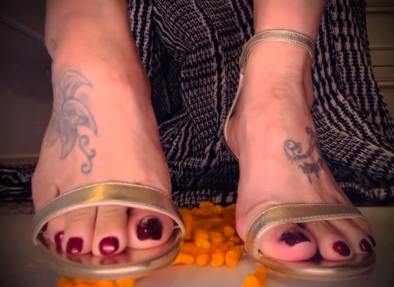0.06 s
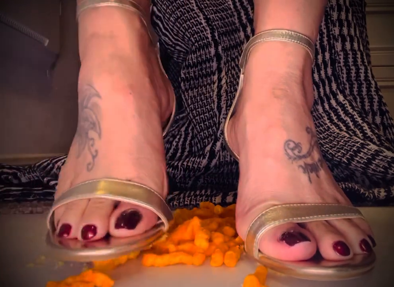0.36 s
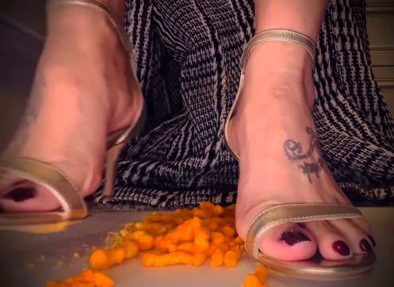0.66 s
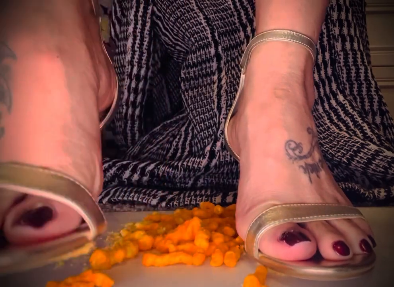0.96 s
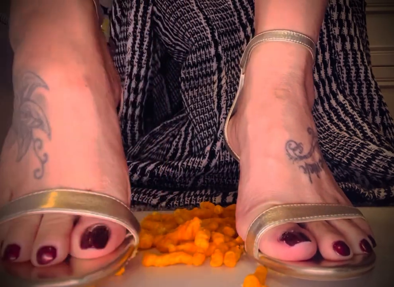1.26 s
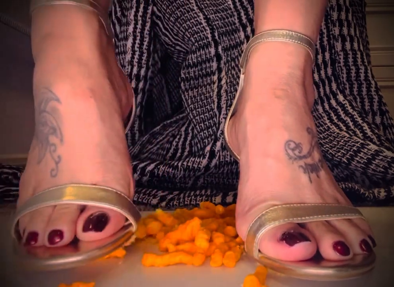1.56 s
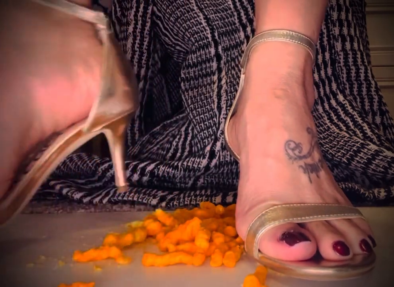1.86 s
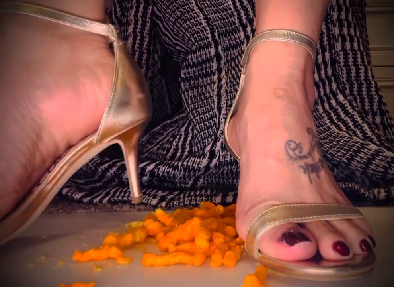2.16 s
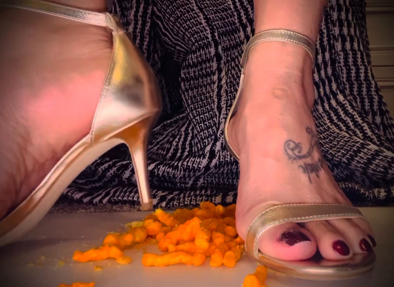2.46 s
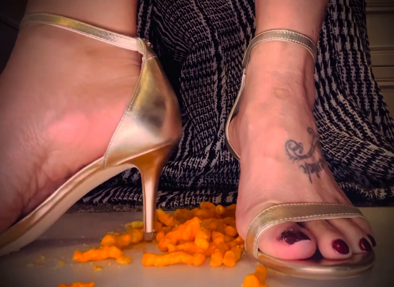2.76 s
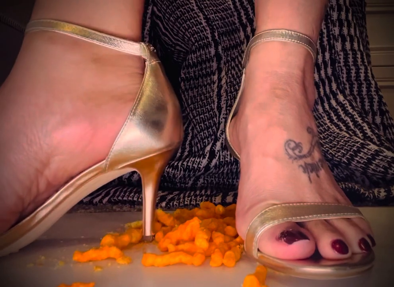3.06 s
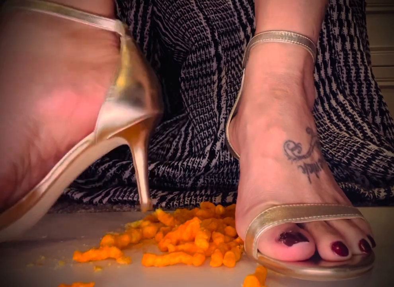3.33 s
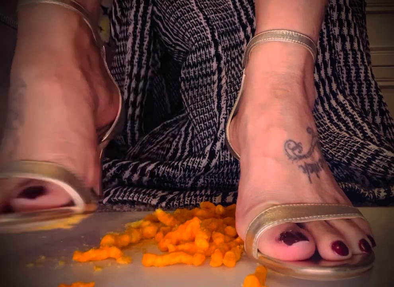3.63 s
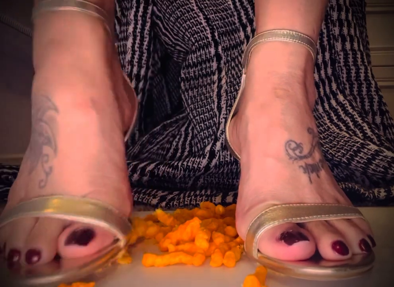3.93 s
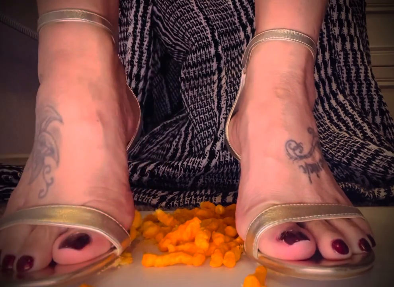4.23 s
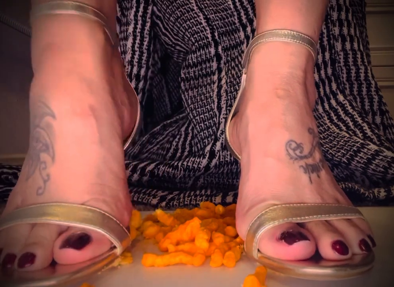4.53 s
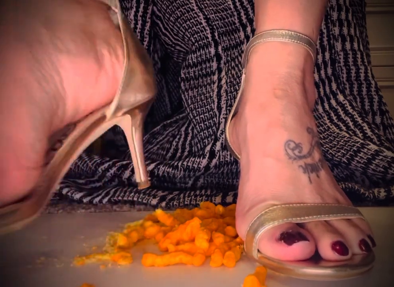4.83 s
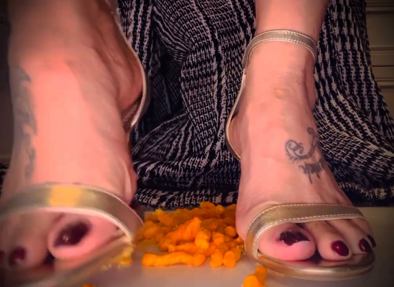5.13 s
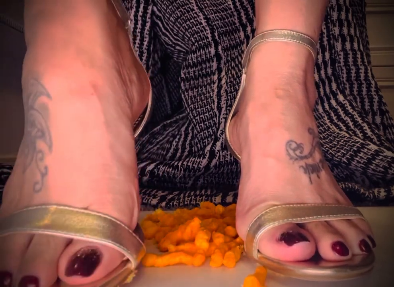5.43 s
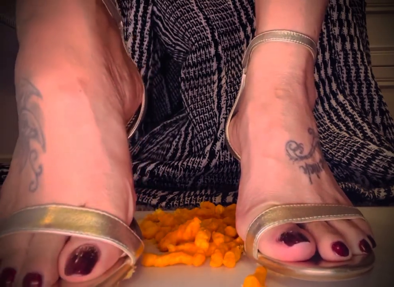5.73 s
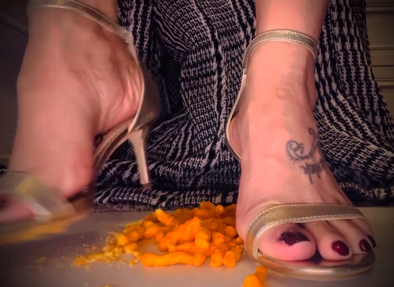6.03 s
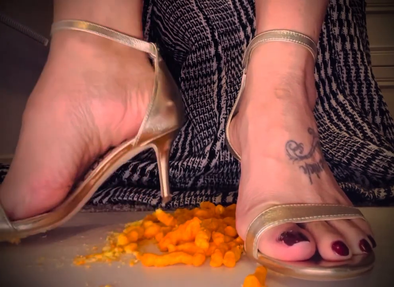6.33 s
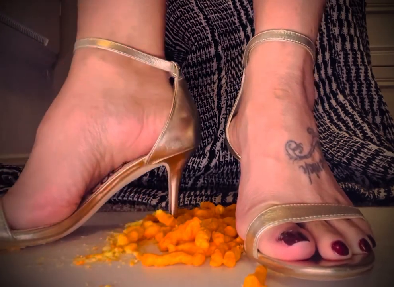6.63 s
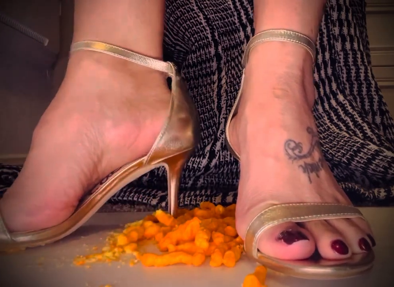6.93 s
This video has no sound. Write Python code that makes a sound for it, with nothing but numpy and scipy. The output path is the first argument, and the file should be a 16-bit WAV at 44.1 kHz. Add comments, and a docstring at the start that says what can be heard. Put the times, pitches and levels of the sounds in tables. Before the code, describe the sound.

Puffed corn snacks are crushed under a high-heeled sandal, heard up close in a small room with a faint low hum. Two gritty drags across the hard floor come first, followed by small snaps as the heel presses into the pile. Two louder, brittle crunches follow as the sole lands and the floor thuds. Brief scuffs and twists fall in between, and light knocks and crackling from the heel end it.

```python
"""A sole rasps back and forth over crumbs, then a high-heeled sandal crushes puffed corn snacks.
Hard floor in a small quiet room, one microphone close to the shoe. The thin heel pokes into the pile,
the sole comes down on it twice, and the heel pokes again: pieces snap, their cell walls crumble,
the shoe rings and the floor thuds under the weight. In between, the shoe scuffs and twists on crumb
dust. Behind it lie faint hiss, rumble and a low drone."""
import sys
import numpy as np
from scipy import signal
from scipy.fft import rfft, irfft
from scipy.io import wavfile

SR = 44100
rng = np.random.default_rng(int(sys.argv[2]) if len(sys.argv) > 2 else 0)


def generate_wav(sig):
    """Save sig (samples, or channels by samples) to the path in sys.argv[1] as 16-bit PCM at SR."""
    pcm = np.round(np.clip(np.atleast_2d(sig).T, -1, 1) * 32767).astype(np.int16)
    wavfile.write(sys.argv[1], SR, pcm)


N = 312669
TIME = np.arange(N) / SR

# whole pieces breaking: t/s, attack level/dB, decay of the splinters/s, pitch of the piece f/Hz
SNAPS = [(2.2974, -49, 0.0011, 4400), (2.336, -47, 0.0016, 4500), (2.5321, -38.5, 0.0012, 3500),
         (2.5677, -40, .002, 2120), (2.5886, -39.5, 0.00048, 3200), (2.5955, -44, .001, 3000),
         (2.6088, -44, .003, 3100), (2.6184, -40.5, .00043, 2600), (2.7385, -43, .0008, 3180),
         (2.7662, -48, .0006, 2300), (2.7818, -43, 0.00079, 5830), (2.8166, -48, 0.0005, 6600),
         (3.912, -45, .011, 6800), (3.9408, -23, .0017, 2400), (3.954, -33, .0008, 6500),
         (3.9602, -22.5, .0017, 2450), (3.975, -20, 0.006, 6300), (3.9935, -23, .0045, 2400),
         (4.026, -31, 0.007, 6500), (4.0583, -34.5, .0059, 3500), (4.091, -32, 0.0033, 3700),
         (4.177, -43.5, .004, 2970), (4.2475, -53, .0008, 7200), (4.333, -57, .003, 6000),
         (4.6463, -44, 0.0028, 2890), (5.229, -41, .0045, 1600), (5.258, -42, 0.0022, 2300),
         (5.3205, -23.5, 0.005, 7230), (5.3284, -23.5, 0.0036, 1490), (5.3764, -36, 0.0039, 7800),
         (5.4302, -34.5, 0.0035, 3100), (6.4859, -47, 0.0011, 3430), (6.7039, -33, 0.0036, 3300),
         (6.72, -38, 0.004, 2300), (6.7304, -36, 0.003, 2700), (6.786, -32, .002, 3550),
         (6.7966, -36.5, 0.0008, 2950), (6.8143, -41, .0006, 2700), (6.835, -49, .001, 3300),
         (6.8597, -51, 0.00041, 3100)]
# spectrum of the breaking snack: f/Hz, level/dB
CRUNCH_SPECTRUM = [(100, -22), (400, -14.5), (750, -17.5), (1550, -7.5), (2300, -4), (3400, -3.5),
                   (4300, -7.5), (5400, -6), (7100, -2.5), (8500, -5), (9300, -10), (14000, -13),
                   (16000, -23)]
# resonances of the sole: f/Hz, width/Hz, relative level/dB
SOLE_MODES = [(1090, 110, 0), (1413, 34, -2), (2120, 60, -4), (2505, 90, -1.5), (3496, 75, 6),
              (3740, 45, 0), (4735, 40, 1), (7050, 180, -7)]
# spectrum of the shaken floor: f/Hz, level/dB
FLOOR_SPECTRUM = [(40, -24), (85, -17), (120, -4.5), (148, 5), (200, 1), (230, -4), (268, -2.5), (310, -13),
                  (600, -20), (2000, -70)]


def snaps(treble_db, splinter_db=5.0, piece_db=-6.5, piece_t60=0.0045, size=4096):
    """A first crack sets off a dying run of splinters; all of them ring the piece at its own pitch."""
    out, t = np.zeros(N), np.arange(size) / SR
    body = response_of(CRUNCH_SPECTRUM)
    for s, snap_db, run_s, piece_hz in SNAPS:
        run = energy_one(grains(per_s=13000, spread_db=1.5, size=size) * np.exp(-t / run_s))
        # the longer the run, the more of the energy lies in it
        force = signal.unit_impulse(size) + from_db(splinter_db) * run_s / .002 * run
        piece = energy_one(through(force, np.gradient(ring(t, piece_hz, piece_t60))))
        share_db = np.interp(s, TIME, treble_db)   # as bright as the push it belongs to
        crack = energy_one(with_treble(through(force, body), share_db)) + from_db(piece_db) * piece
        attack_rms = np.sqrt(np.mean(crack[t < .004] ** 2))
        add(out, s, from_db(snap_db) * crack / attack_rms)
    return out


def crumbling(push, treble_db, level_db=-2.5, clump_db=2.3, dense_above_db=-37, dense_range_db=5):
    """Thin cell walls collapse in clumps: sparser under a light push, a dense crush under full weight."""
    body = response_of(CRUNCH_SPECTRUM)
    clumps = from_db(clump_db * drift(200))
    light = through(fragments(grains(per_s=4200, spread_db=2.7) * clumps), body)
    heavy = through(fragments(grains(per_s=9000, spread_db=2.5) * clumps), body)
    heavy_share = 1 / (1 + np.exp((dense_above_db - 20 * np.log10(push)) / dense_range_db))
    crackle = np.sqrt(1 - heavy_share) * light + np.sqrt(heavy_share) * heavy
    return from_db(level_db) * push * with_treble(crackle, treble_db)


def fragments(clicks, lowest_hz=1100, highest_hz=8500, q=9.0, ring_db=6, count=14):
    """Each click also rings one of many fragments, each with a pitch of its own."""
    struck, out = rng.integers(0, count, N), clicks
    for k, hz in enumerate(np.geomspace(lowest_hz, highest_hz, count)):
        own_clicks = clicks * (struck == k) + 1e-18
        out = out + from_db(ring_db) * signal.lfilter(*signal.iirpeak(hz, q, fs=SR), own_clicks)
    return rms_one(out)


def foot_load():
    """The foot bears down on the pile: gain and treble share/dB of all its pushes together."""
    # pushes: full load t/s, hold/s, level/dB, rise/s, release/s, treble share/dB
    pushes = [(2.169, 0.12, -56, .04, .3, -6.5), (2.603, 0.091, -48, 0.22, 0.2, -5.5),
              (3.942, 0.15, -41, 0.037, .11, -5), (3.976, 0.029, -27, .009, 0.054, -4),
              (5.332, 0.089, -46.5, 0.097, .1, -1.5), (6.488, 0.025, -55.5, 0.0456, .025, -7.5),
              (6.561, .004, -49, .014, .012, -7), (6.715, 0.035, -45, 0.04, 0.056, -9),
              (6.786, 0.01, -45, .014, 0.024, -6.5), (7.003, 0.037, -49, 0.054, 0.22, -6.5)]
    gains = np.array([swell(*push[:-1]) for push in pushes])
    power = np.sum(gains ** 2, axis=0)
    treble_db = np.array(pushes)[:, -1] @ gains ** 2 / power
    return np.sqrt(power), treble_db


def under_sole(s, down_s=3.8, lifted_s=5.6):
    """Whether the sole, rather than the heel, is on the pile at time s."""
    return (s > down_s) & (s < lifted_s)


def shoe_ring(cracks, crumbs, fine_above_hz=2000, heel_ring_db=-12.5):
    """The sole grinds the crumbs finer and rings with every break; the thin heel passes little on."""
    fine_crumbs = signal.sosfilt(signal.butter(1, fine_above_hz, "high", fs=SR, output="sos"), crumbs)
    covered = under_sole(TIME)
    sole = through((cracks + fine_crumbs) * covered, resonances(SOLE_MODES))
    heel = through((cracks + crumbs) * ~covered, resonances(SOLE_MODES, heel_ring_db))
    return sole + heel


def thuds(boom_t60=0.048, board_hz=116, board_t60=0.22, board_rise_s=.024,
          big_break_db=-22.5, drop_knock_db=-27, drop_boom_db=-37, size=22050):
    """Weight lands with a woody knock and a short boom; after a footfall the floorboard rings on."""
    # the shoe is set down or the weight shifts: t/s, knock level/dB, board level/dB, boom level/dB
    footfalls = [(1.183, -51, -52.5, -51.5), (1.984, -34, -48.5, -66), (3.912, -42, -54, -44),
                 (5.228, -36, -56, -47.5), (5.329, -20, -36.5, -38), (6.704, -34.5, -56, -52),
                 (6.73, -36, -50, -50)]
    # spectrum of the knock: f/Hz, level/dB
    knock_spectrum = [(30, -25), (70, -1.5), (150, 3), (330, -4.5), (540, 0), (1000, -8), (1600, -22),
                      (3800, -30), (7000, -55)]
    # its woody ring: f/Hz, level/dB against the impact's peak, t60/s
    knock_modes = [(558, -17, .04), (920, -13, .03)]
    out, t = np.zeros(N), np.arange(size) / SR
    impact, floor = response_of(knock_spectrum), response_of(FLOOR_SPECTRUM)
    impact = np.pad(impact, (0, size - len(impact))) / np.abs(impact).max()
    knock = impact + sum(from_db(db) * ring(t, hz, t60) for hz, db, t60 in knock_modes)
    board_rise = 1 - np.exp(-(t / board_rise_s) ** 2)
    board = early_rms_one(ring(t, board_hz, board_t60) * board_rise)
    dying = from_db(-60 * t / boom_t60)

    def boom():
        """A dying burst of noise shakes the floor."""
        return early_rms_one(through(rng.standard_normal(size) * dying, floor))

    for s, knock_db, board_db, boom_db in footfalls:
        add(out, s, from_db(knock_db) * knock + from_db(board_db) * board + from_db(boom_db) * boom())
    # a break under the sole lets it drop on the floor; small breaks hardly do
    for s, snap_db, *_ in SNAPS:
        drop = under_sole(s) * from_db(1.5 * (snap_db - big_break_db))
        add(out, s, drop * (from_db(drop_knock_db) * knock + from_db(drop_boom_db) * boom()))
    return out


def rumble(push, level_db=-10):
    """The sole sinks through the collapsing pile and shakes the floor, most of all under full weight."""
    shaking = rms_one(through(rng.standard_normal(N), response_of(FLOOR_SPECTRUM)))
    return from_db(level_db) * push * np.sqrt(push / push.max()) * shaking


def slides(judder_db=1.2, hollow_db=7.0, hollow_q=2.03):
    """Crumb dust catches and slips under the moving shoe thousands of times a second."""
    # hollow pitch of the gap between sole and floor: t/s, f/Hz
    gap_pitch = [(.25, 1380), (.43, 900), (1.3, 1300), (1.48, 1790), (1.56, 1180), (2.1, 1250),
                 (4.15, 3100), (5.76, 780), (5.86, 650), (5.9, 1600)]
    judder = from_db(judder_db * drift(220))
    friction, inner_friction = (grains(per_s=12000, spread_db=2.0) * judder for _ in range(2))
    gap_hz = np.interp(TIME, *np.transpose(gap_pitch))
    gap = from_db(hollow_db) * moving_resonance(inner_friction, gap_hz, hollow_q)
    return drags(friction, inner_friction, gap) + scuffs(friction, gap)


def drags(friction, inner_friction, gap, rasp_db=7.0, rasp_q=5.0, rasp_wander=.025):
    """Pressed flat, the sole rasps over the crumbs, back and then forward."""
    # spectrum of the flat sole rubbing: f/Hz, level/dB
    pressed_spectrum = [(100, -12), (300, -15), (820, -15.5), (1150, -7.5), (3200, -.5), (5100, -9),
                        (6200, -7), (8400, -10), (9700, -15.5), (16000, -28)]
    # pitch of the rasp, which also sounds an octave below: t/s, f/Hz
    rasp_pitch = [(.15, 8100), (.42, 7700), (1.18, 7100), (1.42, 6650)]
    # the two strokes: t/s, level/dB, treble share/dB
    back_drag = [(0.0, -53.5, -6), (0.058, -58.5, -6), (0.206, -44.5, -5.5), (0.348, -41.5, -5.5),
                 (0.42, -53, -8), (0.44, -73, 0)]
    forward_drag = [(1.173, -62, -5), (1.178, -43, -6), (1.341, -44, -13), (1.461, -34.5, -9),
                    (1.517, -45, -11.5), (1.569, -46.5, -11.5), (1.593, -56.5, -8.5), (1.605, -76, -7.5)]
    rasp_hz = np.interp(TIME, *np.transpose(rasp_pitch)) * (1 + rasp_wander * drift(20))
    rasp = sum(moving_resonance(inner_friction, hz, rasp_q) for hz in (rasp_hz, rasp_hz / 2))
    pressed = through(friction, response_of(pressed_spectrum)) + gap + from_db(rasp_db) * rasp
    out = np.zeros(N)
    for drag in (back_drag, forward_drag):
        s, level_db, treble_db = np.transpose(drag)
        out += stroke(s, level_db) * with_treble(pressed, np.interp(TIME, s, treble_db))
    return out


def scuffs(friction, gap, sole_ring_db=-3):
    """The edge of the shoe brushes the floor, or twists on its rim with a hollow scrape."""
    # spectrum of the edge brushing lightly: f/Hz, level/dB
    brushed_spectrum = [(100, -21.5), (560, -6.5), (1800, -6), (3400, -4), (4600, -6.5), (7700, -2.5),
                        (16000, -20)]
    # movements: full speed t/s, hold/s, level/dB, rise/s, release/s, treble share/dB
    brushes = [(3.202, .012, -55.5, 0.057, 0.057, -1), (3.335, 0.029, -61, 0.13, 0.029, -6),
               (5.754, 0.04, -58, 0.07, .05, -5), (5.833, 0.022, -40, 0.068, 0.048, -0.8)]
    twists = [(2.066, 0.04, -48.3, 0.034, 0.07, -10), (4.125, .1, -53, .05, .018, -8),
              (5.905, 0.011, -54, 0.049, 0.0084, -14), (6.665, .045, -51, .022, .04, -12)]
    # resonances of the rim: f/Hz, width/Hz, level/dB against the direct sound
    rim_modes = [(2000, 90, 2), (2450, 60, 0), (2860, 97, 8)]
    brushed = through(friction, response_of(brushed_spectrum)) + gap
    sole, rim = resonances(SOLE_MODES, sole_ring_db), resonances(rim_modes)
    out = np.zeros(N)
    for movements, shoe in ((brushes, sole), (twists, rim)):
        rubbed = through(brushed, shoe)
        for *movement, treble_db in movements:
            out += swell(*movement) * with_treble(rubbed, treble_db)
    return out


def room(x, near_db=-13, near_s=0.0089, tail_db=-19.5, tail_t60=0.24, dull_hz=9000, size=22050):
    """The microphone hears the direct sound, quick reflections off floor and shoes, then a soft tail."""
    t = np.arange(size) / SR
    near = rng.standard_normal(size) * np.exp(-t / near_s) * (t > .001)
    tail = rng.standard_normal(size) * from_db(-60 * t / tail_t60) * (t > .008)
    tail = signal.sosfilt(signal.butter(1, dull_hz, fs=SR, output="sos"), tail)
    return x + through(x, from_db(near_db) * energy_one(near) + from_db(tail_db) * energy_one(tail))


def room_tone(air_db=-62.5, drone_hz=111, overtone_hz=163, overtone_db=-6, drone_t60=0.34, rest_db=-72.5):
    """Steady hiss and rumble, with a wavering low drone that swells once and sinks back."""
    # spectrum of the room's noise: f/Hz, level/dB
    air_spectrum = [(22, -9), (40, -12), (120, -13.5), (250, -19.5), (1300, -31), (4000, -35.5),
                    (16000, -38.5)]
    # swell of the drone: peak t/s, hold/s, level/dB, rise/s, release/s
    drone_swell = (4.5, 1.05, -62, 0.04, 0.5)
    air = from_db(air_db) * rms_one(through(rng.standard_normal(N), response_of(air_spectrum)))
    t = TIME[:SR]
    modes = ring(t, drone_hz, drone_t60) + from_db(overtone_db) * ring(t, overtone_hz, drone_t60)
    drone = rms_one(through(rng.standard_normal(N), modes))
    return air + np.maximum(swell(*drone_swell), from_db(rest_db)) * drone


def swell(s, hold_s, level_db, rise_s, release_s, range_db=19.5, rise_bend=1.87, release_bend=1.2):
    """Gain that builds up, holds and dies away; rise and release each cover range_db."""
    early = np.maximum(s - TIME, 0) / rise_s
    late = np.maximum(TIME - s - hold_s, 0) / release_s
    below_db = range_db * (early ** rise_bend + late ** release_bend)   # bends above 1 round the top
    return from_db(np.maximum(level_db - below_db, -200))


def stroke(s, level_db, edge_s=0.0036):
    """Gain of one movement of the foot, silent outside it."""
    gate = np.clip(np.minimum(TIME - s[0], s[-1] - TIME) / edge_s + 1, 0, 1)
    return gate * from_db(np.interp(TIME, s, level_db))


def grains(per_s, spread_db, size=N):
    """Random clicks, mostly small with a few large ones; rms 1."""
    born = rng.random(size) < per_s / SR
    sizes = from_db(spread_db * np.minimum(rng.exponential(1, size), 4))
    return rms_one(born * sizes * rng.choice([-1, 1], size))


def drift(per_s):
    """Random wander; rms 1."""
    knots = rng.standard_normal(int(per_s * N / SR) + 2)
    return rms_one(np.interp(TIME * per_s, np.arange(len(knots)), knots))


def with_treble(x, share_db, split_hz=5600):
    """Give the treble a set share of the power: finer fragments sound brighter."""
    low = signal.sosfilt(signal.butter(2, split_hz, fs=SR, output="sos").repeat(2, axis=0), x)
    high = signal.sosfilt(signal.butter(2, split_hz, "high", fs=SR, output="sos").repeat(2, axis=0), x)
    share = np.clip(from_db(share_db) ** 2, .01, .9)
    return np.sqrt(1 - share) * rms_one(low) + np.sqrt(share) * rms_one(high)


def ring(t, hz, t60):
    """One dying mode."""
    return np.sin(2 * np.pi * hz * t) * from_db(-60 * t / t60)


def resonances(modes, ring_db=0, size=4096):
    """A click heard directly, followed by the ring of the shoe."""
    click = signal.unit_impulse(size)
    rings = sum(from_db(db + ring_db) * signal.lfilter(*signal.iirpeak(hz, hz / width, fs=SR), click)
                for hz, width, db in modes)
    return energy_one(click + rings)


def moving_resonance(x, hz, q, size=512):
    """A resonance whose pitch follows the curve hz."""
    out, state = np.zeros(N), np.zeros((2, 2))
    for i in range(0, N, size):
        peak = np.concatenate(signal.iirpeak(hz[i], q, fs=SR))
        out[i:i + size], state = signal.sosfilt([peak, peak], x[i:i + size], zi=state)
    return out


def response_of(spectrum, size=4096):
    """Causal (minimum-phase) impulse response with the given spectrum; energy 1."""
    hz, db = np.transpose(spectrum)
    grid = np.maximum(np.arange(size // 2 + 1) * SR / size, 1)
    gain = from_db(np.interp(np.log(grid), np.log(hz), db))
    cepstrum = irfft(np.log(gain))
    cepstrum[1:size // 2] *= 2
    cepstrum[size // 2 + 1:] = 0
    return energy_one(irfft(np.exp(rfft(cepstrum))))


def through(x, response):
    """Pass a sound through an impulse response."""
    return signal.fftconvolve(x, response)[:len(x)]


def add(out, s, sound):
    """Mix a sound in at time s."""
    start = max(round(s * SR), 0)
    part = out[start:start + len(sound)]
    part += sound[:len(part)]


def from_db(db):
    """Decibels to gain."""
    return 10 ** (np.asarray(db) / 20)


def rms_one(x):
    """Scale to rms 1."""
    return x / np.sqrt(np.mean(x ** 2) + 1e-20)


def energy_one(x):
    """Scale to energy 1."""
    return x / np.sqrt(np.sum(x ** 2) + 1e-20)


def early_rms_one(x):
    """Scale a thud to rms 1, taking it to last 30 ms."""
    return energy_one(x) * np.sqrt(.03 * SR)


def scene():
    """Everything the foot does, heard from close by over the room tone; mono."""
    push, treble_db = foot_load()
    background = room_tone()
    shoe_on_floor = slides() + thuds() + rumble(push)
    crumbs = crumbling(push, treble_db)
    crunch = shoe_ring(snaps(treble_db), crumbs)
    return (room(crunch + shoe_on_floor) + background)[None]


def record(dry, cutoff_hz=16200, dc_offset=.0078):
    """The recorder cuts the top and adds a small constant offset."""
    return signal.sosfilt(signal.ellip(10, .1, 80, cutoff_hz, fs=SR, output="sos"), dry) + dc_offset


dry = scene()
out = record(dry)
generate_wav(out)
```